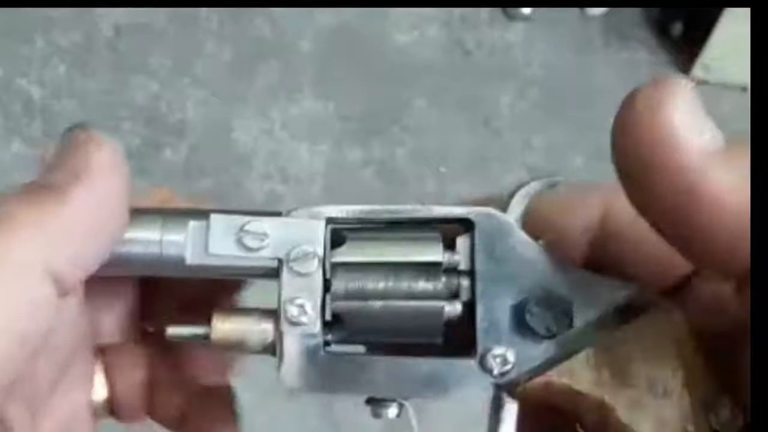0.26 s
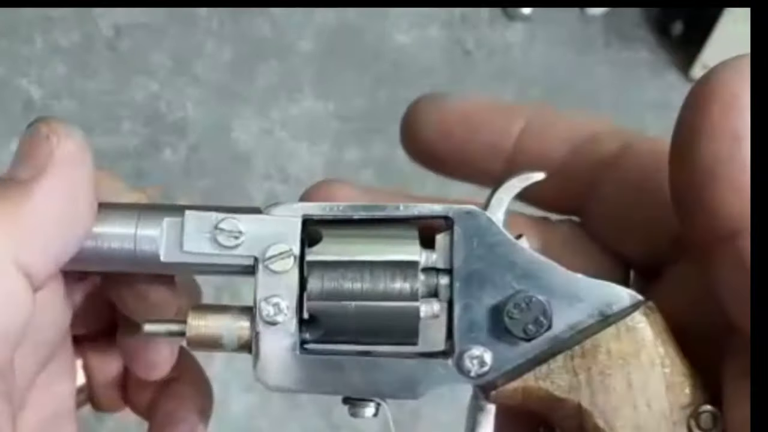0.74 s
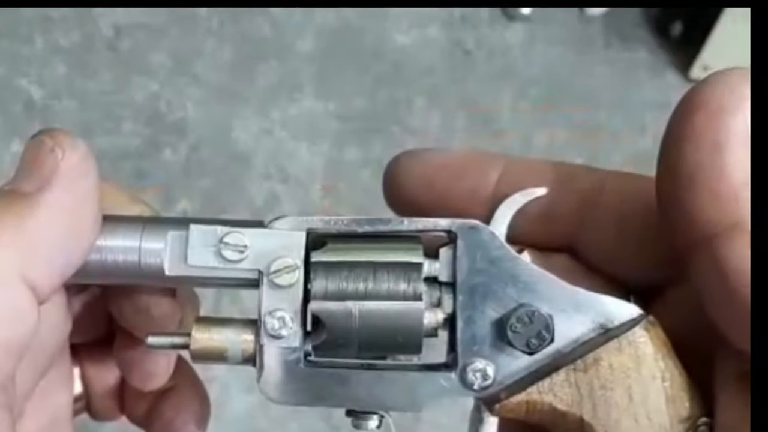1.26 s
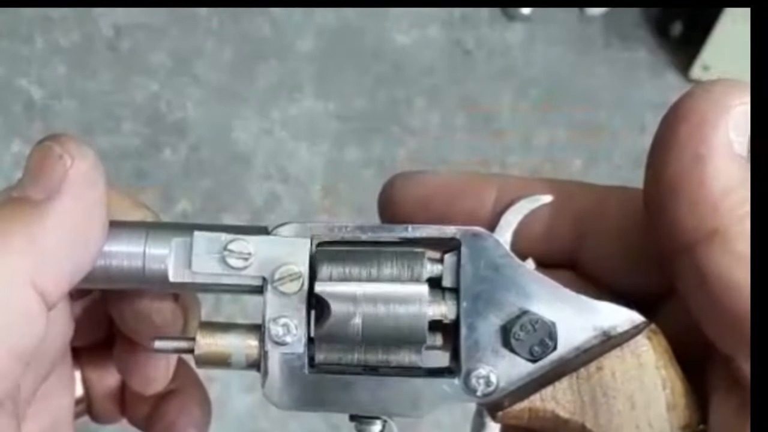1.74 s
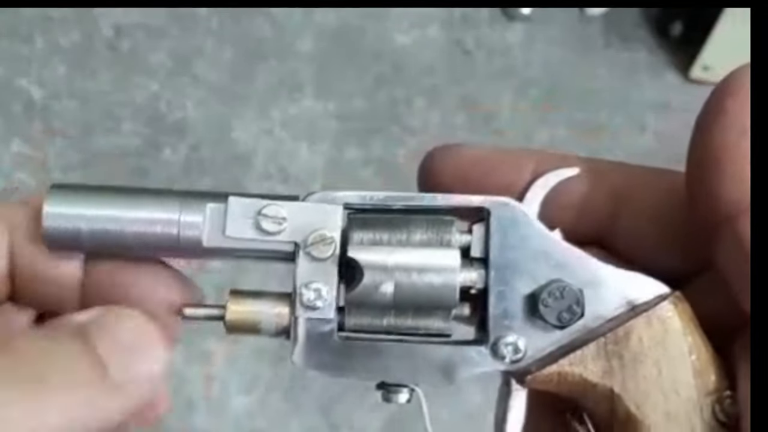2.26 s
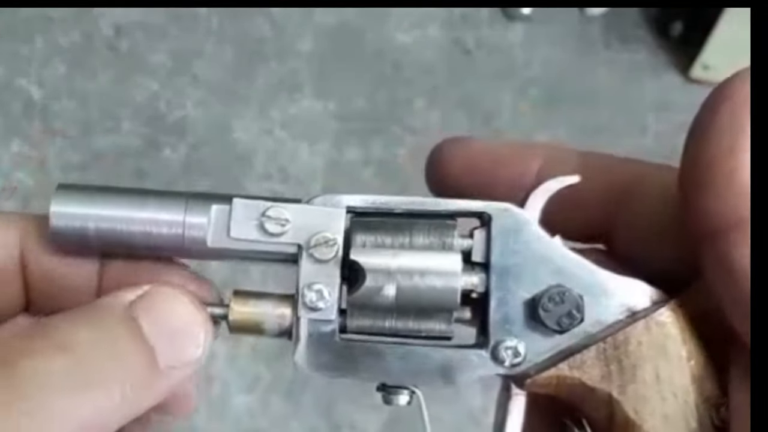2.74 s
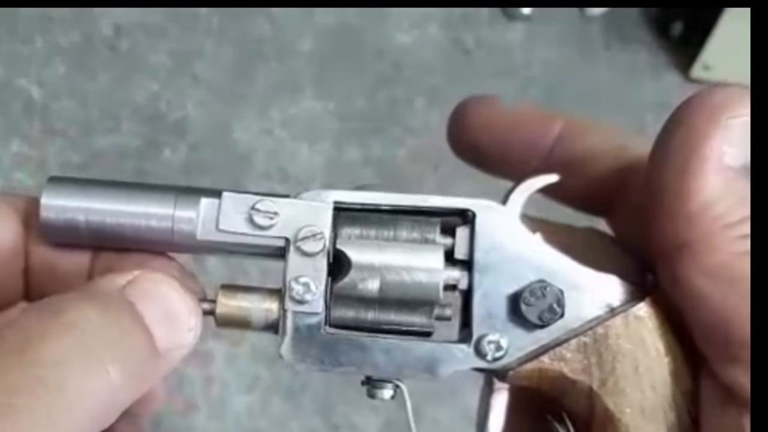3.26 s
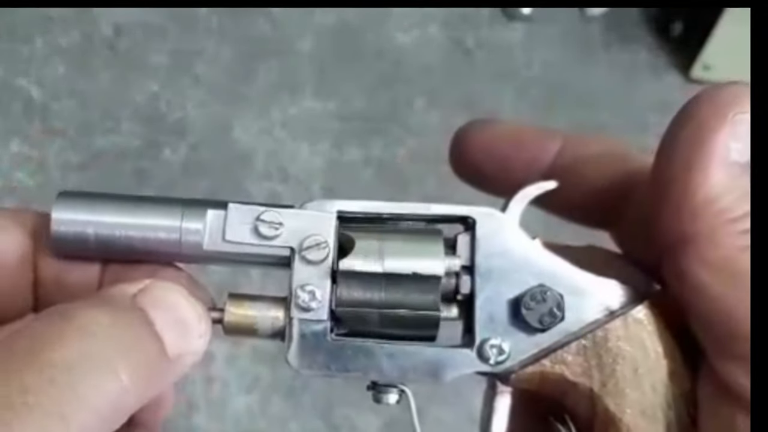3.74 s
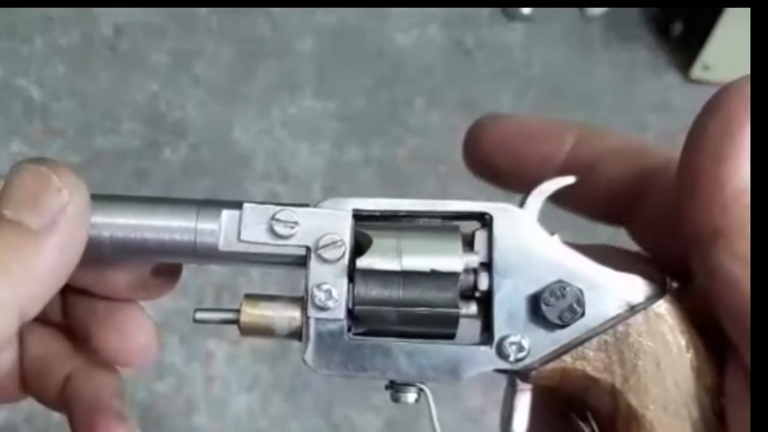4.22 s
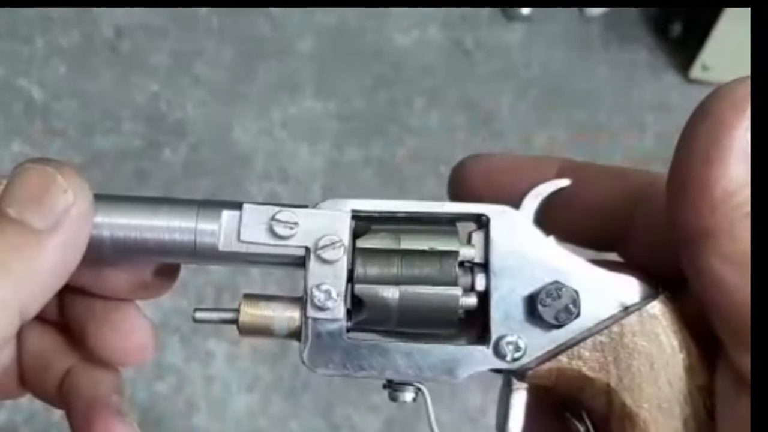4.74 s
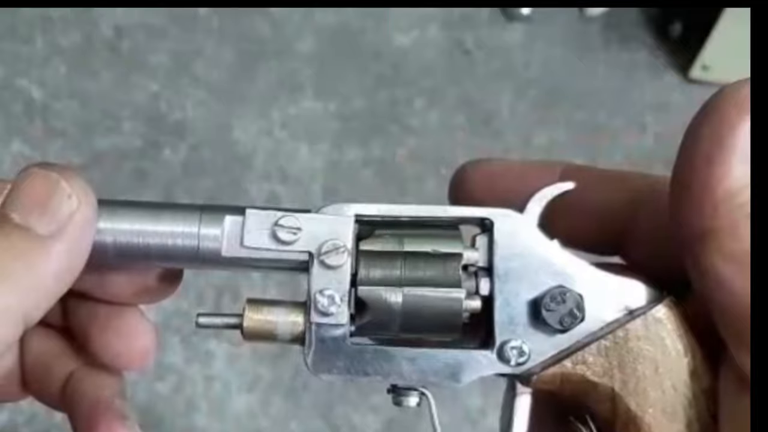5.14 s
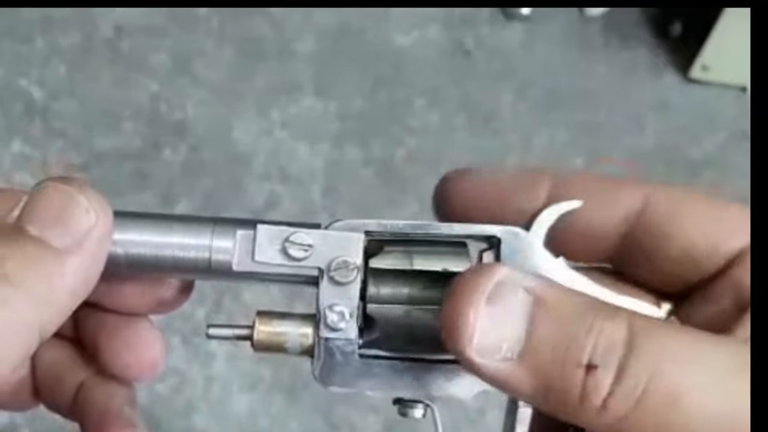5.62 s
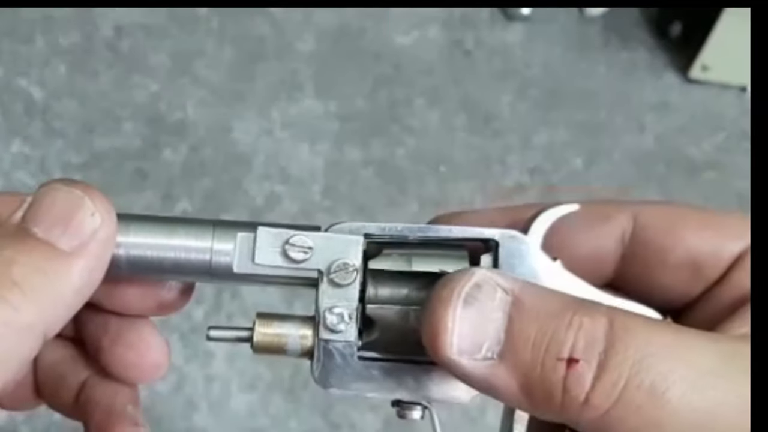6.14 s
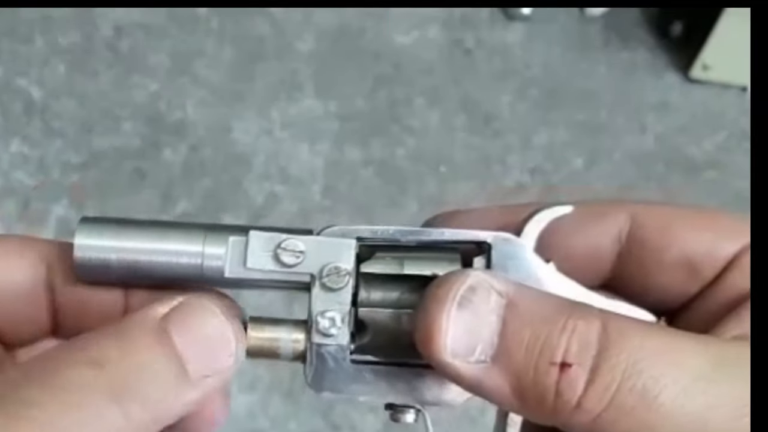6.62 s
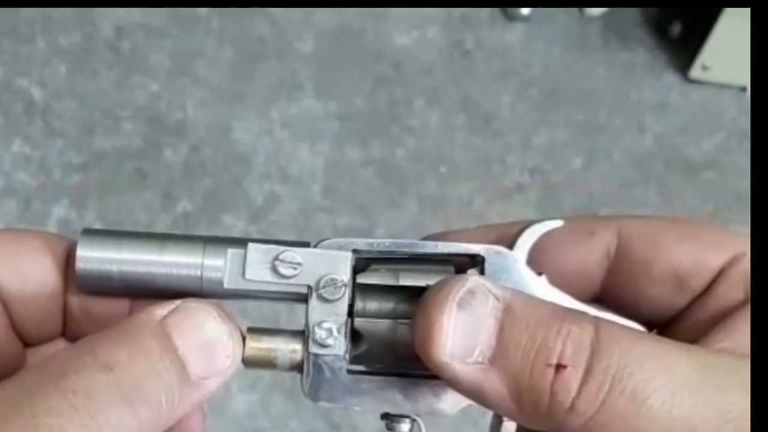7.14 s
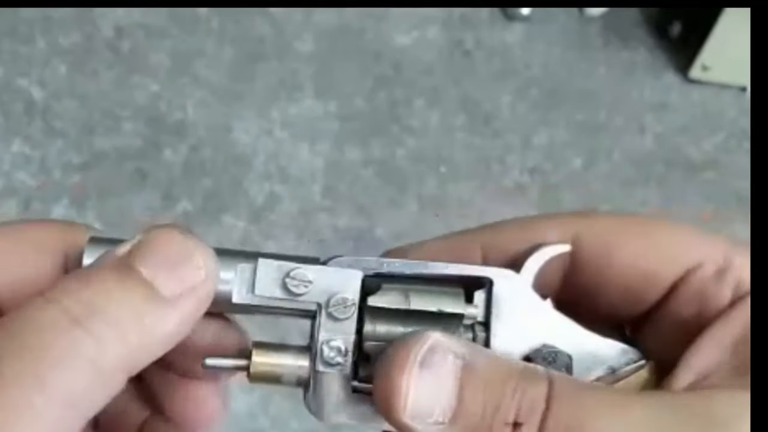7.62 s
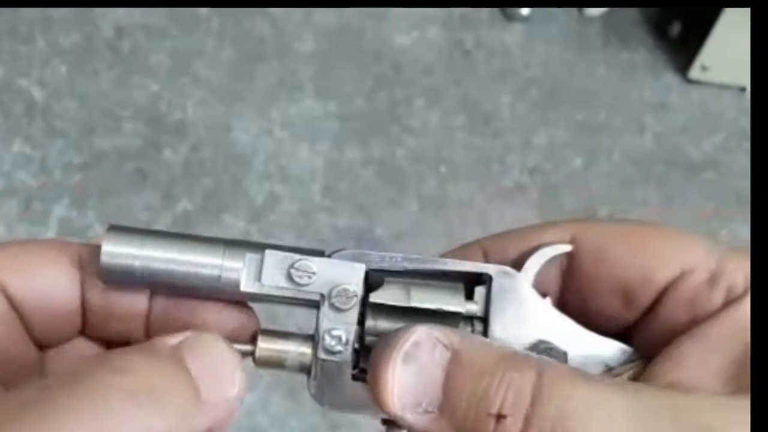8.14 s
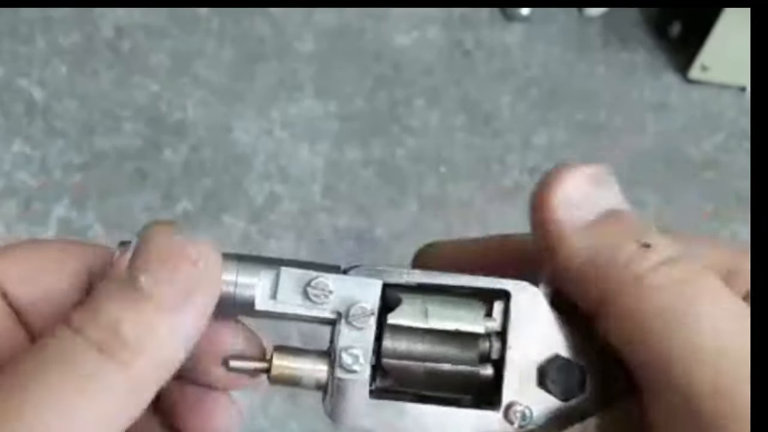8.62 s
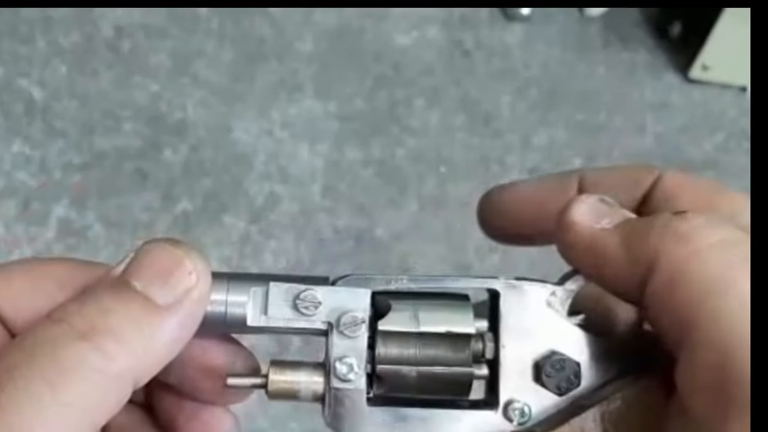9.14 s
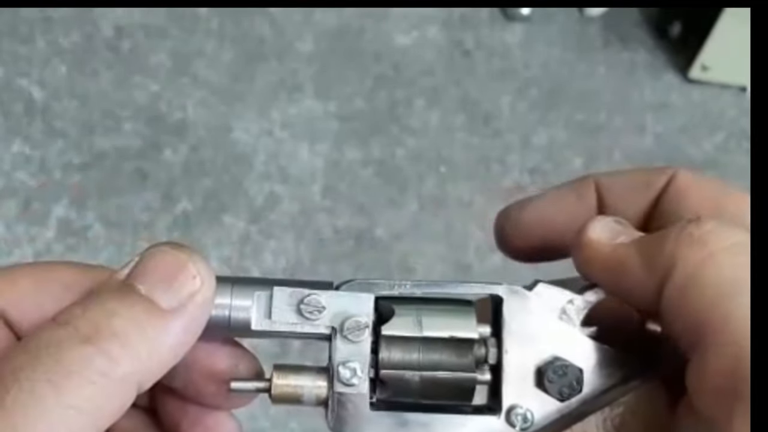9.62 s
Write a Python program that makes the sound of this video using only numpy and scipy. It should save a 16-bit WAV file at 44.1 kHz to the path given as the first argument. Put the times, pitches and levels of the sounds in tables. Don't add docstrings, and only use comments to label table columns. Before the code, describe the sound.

Small steel revolver handled in a hard-walled workshop: two sharp close metallic snaps, brief cylinder rub, scattered ticks and clanks over low hum.

```python
import sys
import numpy as np
from scipy import signal
from scipy.fft import rfft, irfft, next_fast_len
from scipy.io import wavfile

SR = 44100
rng = np.random.default_rng(int(sys.argv[2]) if len(sys.argv) > 2 else 0)


def makeup_ratio(level_db):
    decades = np.asarray(level_db, float) / 20
    return 10 ** decades


def master(y):
    cut = np.clip(np.atleast_2d(y).T, -1, 1)
    pcm = np.round(cut * 32767)
    wavfile.write(sys.argv[1], SR, pcm.astype(np.int16))


N = 435708
RIGHT_LAG = 10


def rms_one(x):
    return x / np.sqrt(np.mean(x ** 2) + 1e-20)


def in_time(rows):
    s, *columns = np.transpose(rows)
    return [np.interp(np.arange(N) / SR, s, c) for c in columns]


def at_hz(points, hz):
    points_hz, values = np.transpose(points)
    return np.interp(np.log(hz), np.log(points_hz), values)


def drift(rate_hz, at=np.arange(N)):
    step = 40
    r = np.exp(-2 * step * np.pi * rate_hz / SR)
    noise = rng.standard_normal(N // step + 2002)
    slow = signal.lfilter([1], [1, -2 * r, r * r], noise)[2000:]
    return np.interp(at / step, np.arange(len(slow)), rms_one(slow))


def swell_db(t, start_s, end_s, rise_s, fall_s):
    before = np.maximum(start_s - t, 0)
    after = np.maximum(t - end_s, 0)
    return -20 * (before / rise_s + after / fall_s)


def resonance(x, hz, width_hz):
    r = np.exp(-np.pi * width_hz / SR)
    poles = [1, -2 * r * np.cos(2 * np.pi * hz / SR), r * r]
    return signal.lfilter((1 - r * r) / 2 * np.array([1, 0, -1]), poles, x)


def modes(x, table):
    return sum(makeup_ratio(db) * resonance(x, hz, width_hz) for hz, width_hz, db in table)


def band(x, low_hz, high_hz, order=2):
    sos = signal.butter(order, [low_hz, min(high_hz, .45 * SR)], "band", fs=SR, output="sos")
    return signal.sosfilt(sos, x) * np.sqrt(SR / 2 / (high_hz - low_hz))


def add(out, start_s, sound):
    i = round(start_s * SR)
    out[:, i:i + sound.shape[1]] += sound[:, :N - i]


def contact_and_echoes(direct_db, room_db, contact_s, first_echo_s, build_s, alike=0, chatter=0.39):
    room_t60_s = 0.21
    t = np.arange(round(.3 * SR)) / SR
    burst = chatter * rng.standard_normal(len(t)) * makeup_ratio(-60 * t / contact_s)
    burst[0] = 2
    lumps = np.repeat(rng.standard_normal((2, len(t) // 60 + 1)), 60, axis=1)[:, :len(t)]
    shared = rng.standard_normal(len(t))
    own = rng.standard_normal((2, len(t)))
    alike = np.clip(alike, 0, 1)
    echoes = (np.sqrt(alike) * shared + np.sqrt(1 - alike) * own) * makeup_ratio(1.5 * lumps)
    late = np.maximum(t - first_echo_s, 0)
    echoes = echoes * (1 - np.exp(-late / build_s)) * makeup_ratio(-60 * late / room_t60_s)
    return makeup_ratio(direct_db) * np.stack([burst, burst]), makeup_ratio(room_db) * echoes


def strike(*args, **options):
    return sum(contact_and_echoes(*args, **options))


def banded_noise(spectrum, edges, patchy_db):
    # pitch_hz, likeness (0 to 1)
    likeness = [(60, 0.34), (200, 0.56), (400, 0.56), (700, 0.79), (1300, 0.34), (3000, 0.075)]
    out, white = 0, rng.standard_normal((2, 2, N))
    for k, (low_hz, high_hz) in enumerate(zip(edges, edges[1:])):
        sos = signal.butter(2, [low_hz, high_hz], "band", fs=SR, output="sos")
        mid, side = signal.sosfilt(sos, white[k % 2])
        centre_hz = np.sqrt(low_hz * high_hz)
        alike = np.clip(at_hz(likeness, centre_hz), -1, 1)
        gain = makeup_ratio(at_hz(spectrum, centre_hz) + patchy_db * drift(5.7))
        out = out + gain * (np.sqrt(1 + alike) * mid + np.sqrt(1 - alike) * side * [[1], [-1]])
    return rms_one(out)


def background():
    # time_s, level_db
    activity = [(0.0, -61), (1.13, -61), (1.7, -55.5), (2.72, -61), (3.16, -57), (3.44, -59), (6.55, -62),
                (7.6, -58.5), (8.03, -60.5), (9.74, -61), (9.88, -58.5)]
    # pitch_hz, density_db (per Hz)
    low_air = [(20, -27.5), (48, -6.5), (75, -7.5), (143, 0), (188, -1.5), (226, -4), (292, -32),
               (385, -22)]
    # pitch_hz, density_db (per Hz)
    bustle_air = [(292, -29), (385, -22.5), (452, -29), (597, -29), (926, -26), (1340, -29), (5000, -39.5),
                  (6500, -68)]
    bustle_db, = in_time(activity)
    mid, side = rng.standard_normal((2, N))
    air = mid + 0.2 * side * [[1], [-1]]
    rumble = makeup_ratio(-65) * rms_one(band(air, 84.0, 110.0))
    hum = makeup_ratio(-61.5) * rms_one(band(air, 182.3, 202.4) + makeup_ratio(-5.5) * band(air, 159.0, 170.2))
    overtones = makeup_ratio(-69.5) * band(air, 427.7, 471.6) + makeup_ratio(-72.0) * band(air, 241, 300)
    low = makeup_ratio(-55.5) * banded_noise(low_air, 22 * 2 ** np.arange(0, 3.9, .4), patchy_db=2.5)
    bustle = banded_noise(bustle_air, 290 * 2 ** np.arange(0, 4.1, .33), patchy_db=2.0)
    return rumble + hum + overtones + low + makeup_ratio(bustle_db + 1.5) * bustle


def drones():
    # middle_s,
    # pitch_hz, level_db, length_s
    machines = [(.1, 84, -53.5, 0.24), (0.456, 84, -59, 0.23), (1.2, 85, -47, 0.086),
                (1.598, 85, -48, 0.13), (2.054, 86, -54, 0.35), (2.85, 66, -62, 0.57),
                (4.3, 100, -61, 0.66), (4.55, 66, -67, 0.55), (7.0, 86, -60.5, 0.72), (7.924, 87, -46, .04),
                (8.35, 86, -46, 0.05), (9.0, 104, -64.5, 0.66), (.6, 192, -57.5, 1.0),
                (1.203, 197, -48.5, 0.065), (1.8, 168, -58, 0.67), (2.56, 195, -53.5, 0.14),
                (3.19, 182, -40, 0.03), (4.21, 197, -56, 0.82), (5.29, 198, -50.5, 0.47),
                (6.146, 190, -57, .6), (7.0, 196, -56.5, 0.052), (7.646, 198, -57.5, .1),
                (7.92, 172, -53.5, .06), (8.34, 178, -52, 0.047), (9.85, 193, -55, 0.055)]
    wobble_hz, steady = 6.8, 1.15
    out = np.zeros(N)
    for middle_s, hz, db, length_s in machines:
        start_s, end_s = middle_s - length_s / 2, middle_s + length_s / 2
        edge_s = 0.095 + 0.44 * length_s
        first = max(0, round((start_s - 2 * edge_s) * SR))
        last = min(N, round((end_s + 2 * edge_s) * SR))
        i = np.arange(first, last)
        waver = min(1, length_s / 0.25)
        a, b = waver * drift(wobble_hz, i), waver * drift(wobble_hz, i)
        phase = 2 * np.pi * hz * i / SR
        tone = (steady + a) * np.cos(phase) + b * np.sin(phase)
        out[i] += makeup_ratio(db - 3.0 + swell_db(i / SR, start_s, end_s, edge_s, edge_s)) * tone
    return out


def knocks():
    # start_s, peak_db, ring_hz, body_db, hardness_db
    dull_knocks = [(0.813, -48.5, 1130, -7, 5.5), (1.443, -42, 1100, -3, 3), (2.513, -48, 1040, 0, -2),
                   (2.578, -45.5, 795, -14, -14), (2.94, -44.5, 1130, -0.5, 0),
                   (3.07, -44.5, 466, -15, -2.5), (3.152, -26.5, 1300, 1.0, 3),
                   (3.655, -53, 635, 0.5, -15.5), (3.723, -36.5, 1640, -15, 5), (3.809, -50.5, 1420, -1, 4),
                   (4.249, -50.5, 465, 0.5, 4.5), (4.742, -39, 721, -11.5, 11.5),
                   (5.152, -32, 500, -17.5, -3), (5.171, -38, 550, -16, -6), (5.182, -49, 675, -16, -6),
                   (5.196, -43, 490, -10, -6), (5.759, -52, 2330, -5, 10), (6.894, -52, 1060, -3, 7),
                   (6.946, -40.5, 1340, -2.5, 19), (7.49, -42.5, 716, -11, -7), (7.591, -44, 960, -8.5, 12),
                   (7.724, -37, 1120, -13, 2.5), (7.864, -36, 1070, 0.2, -3.5), (8.029, -43, 774, -12, -2),
                   (8.316, -42, 1130, -6, 11), (8.56, -61, 480, 9, 9.5)]
    # start_s, peak_db, ring_hz
    hollow_thuds = [(2.599, -42, 269), (2.945, -41, 2100), (3.055, -44, 1240), (3.153, -21, 860),
                    (3.154, -34, 286), (3.726, -39.5, 2280), (8.32, -40.5, 1900), (8.322, -48, 604),
                    (9.771, -47, 1010), (5.197, -39, 2430), (7.864, -35, 730), (3.1, -43, 1300)]
    out = np.zeros((2, N))
    for start_s, db, hz, body_db, hard_db in list(dull_knocks) + [(*row, -24, 0) for row in hollow_thuds]:
        blow = strike(11.4, 0.0, contact_s=0.0062, first_echo_s=0.0018, build_s=0.005, alike=0.27)
        thud = makeup_ratio(-hard_db) * band(blow, 374, 840, order=3)
        rap = makeup_ratio(hard_db) * band(blow, 2020, 3360, order=3)
        broad = makeup_ratio(body_db) * (band(blow, 836, 1800, order=3) + makeup_ratio(-6.5) * (thud + rap))
        ring = makeup_ratio(-4.5) * band(blow, hz * 0.878, hz * 1.128)
        add(out, start_s, makeup_ratio(db - 2.5) * (broad + ring))
    return out


def ticks(table, sharpness, gain_db):
    out = np.zeros((2, N))
    for start_s, db, hz, room_db in table:
        blow = strike(0.0, room_db - 5.0, contact_s=0.011, first_echo_s=0.0076, build_s=0.0045)
        ring = resonance(resonance(blow, hz, hz / sharpness), hz, hz / sharpness)
        add(out, start_s, makeup_ratio(db + gain_db) * ring)
    return out


def small_parts():
    # start_s, peak_db, ring_hz, room_db
    contacts = [(0.8586, -39, 6100, -22), (2.596, -41, 4700, -25), (3.5947, -42.5, 5200, -18),
                (4.2453, -47.5, 7300, -4.5), (5.9388, -34, 9100, -18), (6.6363, -40, 4900, -18),
                (6.806, -44.5, 5000, -18), (7.2449, -40.5, 5800, 2), (7.3577, -40.5, 5500, -4.5),
                (8.7228, -40, 7300, -8), (8.8105, -47, 7500, -15), (8.762, -43, 7700, -12),
                (8.682, -46, 5000, -16), (7.678, -48, 6400, -12), (7.6098, -40, 5200, -14),
                (6.9643, -25, 5000, -22), (6.948, -29, 8000, -22), (9.5876, -48, 4500, -18)]
    # start_s, peak_db, ring_hz, room_db
    pings = [(2.597, -53, 3950, -20), (2.779, -42, 4000, -14), (4.417, -53, 3970, -5),
             (7.678, -43, 4300, -19), (9.475, -51, 6600, -21), (6.8678, -42, 6500, -18),
             (1.4405, -42, 5400, -16), (8.754, -43, 4500, -8), (8.69, -52, 4440, -13)]
    # start_s, peak_db, ring_hz, room_db
    more_pings = [(3.128, -56, 4200, -14), (4.268, -50, 3900, -10), (4.268, -52, 6900, -12),
                  (4.42, -54, 7400, -10), (4.355, -56, 6500, -10), (7.678, -50, 7400, -18),
                  (8.347, -46, 4200, -16), (8.317, -46, 4900, -12), (8.562, -48, 8300, -10),
                  (9.588, -53, 6900, -18), (8.81, -52, 4400, -14), (3.162, -43, 2600, -2),
                  (5.2, -50, 7000, 0), (3.153, -33, 4500, -12), (6.946, -40, 3600, -4),
                  (4.9, -50, 6000, -12), (2.597, -50, 6300, -16)]
    return ticks(contacts, 1.3, gain_db=14) + ticks(pings, 5.0, gain_db=24) + ticks(more_pings, 5.5, gain_db=24)


def squeaks():
    # peak_s, pitch_hz, peak_db, rise_s, fall_s (per 20 dB)
    events = [
        (8.197, 5800, -51.5, .012, .075),
        (1.152, 1010, -63, .05, .055),
        (9.32, 2178, -77, .1, .33),
        (9.15, 2150, -89, .45, .5),
        (9.7, 2180, -86, .3, .4),
        (9.48, 2520, -89, .4, .6),
    ]
    widths = [600, 60, 16, 30, 30, 24]
    steadiness = [0, 0, 5.0, 2.0, 2.0, 1.5]
    out, t = np.zeros((2, N)), np.arange(N) / SR
    for (peak_s, hz, db, rise_s, fall_s), width_hz, steady in zip(events, widths, steadiness):
        smooth = signal.butter(4, width_hz / 2, fs=SR, output="sos")
        wobble = rms_one(signal.sosfilt(smooth, rng.standard_normal((2, 2, N))))
        phase = 2 * np.pi * hz * (t + np.array([[0], [RIGHT_LAG / SR]]))
        tone = (steady + wobble[0]) * np.cos(phase) + wobble[1] * np.sin(phase)
        out += makeup_ratio(db + 16.0 + swell_db(t, peak_s, peak_s, rise_s, fall_s)) * rms_one(tone)
    return out


def steel(blow, hz, crack_db, bright_db, air_db):
    low = makeup_ratio(-bright_db) * band(blow, 3450, 5150, order=3)
    high = makeup_ratio(4.5) * band(blow, 5470, 9160, order=3)
    air = makeup_ratio(air_db + 11.5) * band(blow, 9600, 18500)
    ring = makeup_ratio(-5.0) * band(blow, hz * 0.866, hz * 1.096, order=3)
    return makeup_ratio(crack_db) * (low + high + air) + ring


def clanks():
    # start_s, peak_db, ring_hz, crack_db, brightness_db
    tool_clanks = [(1.3379, -23, 4370, -4, 10), (1.4394, -41, 3800, -5, 1), (2.15, -46, 6940, -4, -3),
                   (2.1834, -33, 3140, -13, 6), (2.257, -34.5, 3260, -8, 1), (2.937, -40, 2650, -13.5, -7),
                   (3.153, -19, 4100, -5.5, -1), (3.454, -39.5, 8750, -10, -1),
                   (3.7163, -39.5, 6000, 3.5, 2), (3.8036, -36, 8900, -9, 0), (4.2448, -42.5, 6940, -6, -8),
                   (4.7436, -35, 6900, -3, 11.5), (5.1915, -29.5, 7040, -7, -6), (6.86, -40, 6200, -10, 3),
                   (6.896, -41, 7700, -11, -14), (6.9468, -19.5, 4730, -3.5, -8),
                   (7.243, -30, 6300, -25, -14), (7.3596, -37, 5730, -1, 20.5), (7.592, -23, 5000, -14, -2),
                   (7.856, -27, 5470, -13, -2.5), (8.31, -30.5, 4680, -5, 7), (8.682, -44.5, 8600, 0.1, 3)]
    # start_s, peak_db, ring_hz, crack_db
    second_rings = [(2.155, -38, 9000, -30), (2.191, -36, 4300, -30), (3.151, -20, 8900, -30),
                    (4.268, -48, 8850, -27), (6.945, -17.5, 7900, -8.5), (7.593, -24.5, 4300, -30),
                    (8.2, -40, 6900, -4), (3.283, -44, 4100, -30), (4.746, -34, 5000, -30),
                    (9.415, -45, 4020, -20), (5.904, -36, 14000, -30), (8.882, -43, 4400, -20),
                    (1.338, -24.5, 12500, -30), (6.52, -36, 13000, -30)]
    out = np.zeros((2, N))
    for start_s, db, *colour in list(tool_clanks) + [(*row, 6) for row in second_rings]:
        blow = strike(5.4, 0.0, contact_s=0.017, first_echo_s=0.00087, build_s=0.0076, alike=0.1)
        add(out, start_s, makeup_ratio(db - 8.5) * steel(blow, *colour, air_db=-16))
    return out


def cylinder_rub():
    # time_s, level_db
    rub_level = [(1.36, -54), (1.4, -61), (1.51, -60), (1.6, -57.5), (1.67, -55), (1.72, -53), (1.8, -54),
                 (1.9, -55.5), (1.95, -65), (2.02, -73)]
    # pitch_hz, width_hz, level_db
    rub_modes = [(930, 150, 12), (1400, 314, 6), (2960, 900, 8), (3600, 400, 7), (5400, 2000, 6.5),
                 (7800, 380, 11.5), (8400, 2200, -1)]
    before, after = (rub_level[0][0] - .02, -90), (rub_level[-1][0] + .05, -90)
    db, = in_time([before] + list(rub_level) + [after])
    rub = rms_one(modes(rng.standard_normal((2, N)), rub_modes))
    return makeup_ratio(db + 5.5 + 1.5 * drift(4.1)) * rub


def snap_blow(touches, room_db, chatter):
    blow, echoes = contact_and_echoes(0.0, room_db, contact_s=0.016, first_echo_s=.003, build_s=.004,
                                      chatter=chatter)
    blow[:, 0] = 0
    for k, (ms, touch_db) in enumerate(touches):
        blow[:, round((ms + .35) * SR / 1000)] += 2 * makeup_ratio(touch_db) * (-1) ** k
    wall = round(0.0098 * SR)
    blow[:, wall:] += makeup_ratio(-22) * blow[:, :-wall]
    return blow, echoes


def radiate(blow, ringing, low_hz, push_db):
    small = band(ringing, low_hz, 19000, order=4)
    jolt = np.abs(blow) * (np.arange(blow.shape[1]) < 50)
    return small + makeup_ratio(push_db) * band(jolt, 40, 1240, order=1)


def latch_snap(room_db):
    # after_ms, level_db
    touches = [(-0.29, -15), (0.0, -1.5), (0.32, -6), (0.85, -3.5), (1.48, -5), (2.82, -14), (4.76, -13)]
    # pitch_hz, width_hz, level_db
    body = [(2440, 590, -7), (3540, 220, -9), (3850, 280, 0.5), (4700, 400, -3), (5250, 500, -1),
            (6150, 280, 2), (6740, 240, -4), (7420, 330, -3), (8750, 420, 7), (10790, 260, 1.5),
            (11760, 260, 1)]
    # pitch_hz, width_hz, level_db
    top = [(13000, 510, -8), (15550, 300, 1)]
    # pitch_hz, width_hz, level_db
    wall_ranges = [(3600, 1100, -2.5), (4700, 900, -3), (5700, 1200, -1), (7100, 1200, -4), (8800, 900, -3),
                   (11300, 1000, -1), (13500, 2500, -11), (15500, 1000, -12)]
    blow, echoes = snap_blow(touches, room_db, chatter=0.1)
    ringing = modes(blow, list(body) + list(top)) + makeup_ratio(-17) * blow + modes(echoes, wall_ranges)
    return radiate(blow, ringing, low_hz=3100, push_db=-32.0)


def hammer_snap(room_db):
    # after_ms, level_db
    touches = [(-0.14, -12), (0.0, 0.5), (0.48, -3.5), (1.7, -13.5), (2.52, -15)]
    # pitch_hz, width_hz, level_db
    body = [(4400, 260, -7), (5300, 600, -17), (6010, 240, -5), (6550, 260, 7.5), (7500, 650, 9.5),
            (9060, 320, 2.5), (9480, 300, 5), (13370, 500, -16), (15800, 1800, -7)]
    # pitch_hz, width_hz, level_db
    wall_ranges = [(4300, 1000, -11), (5500, 1200, -5), (6600, 450, 6), (7500, 900, 1), (9250, 600, 3),
                   (13000, 1200, -3), (15000, 1500, -8)]
    # pitch_hz, width_hz, level_db
    quiet_range = (11000, 1900, -18)
    blow, echoes = snap_blow(touches, room_db, chatter=0.07)
    ringing = modes(blow, body) + makeup_ratio(-28) * blow + modes(echoes, wall_ranges)
    gap_hz, gap_width_hz, gap_db = quiet_range
    ringing = ringing + (makeup_ratio(gap_db) - 1) * resonance(ringing, gap_hz, gap_width_hz)
    return radiate(blow, ringing, low_hz=3900, push_db=-45)


def snaps():
    # start_s, peak_db, room_db
    events = [
        (1.7257, -2.5, -26.5),
        (9.8127, -3.3, -32),
    ]
    right_leads = [-1, 3]
    out = np.zeros((2, N))
    for (start_s, db, room_db), part, lead in zip(events, [latch_snap, hammer_snap], right_leads):
        left, right = makeup_ratio(db + 8.5) * part(room_db)
        add(out, start_s, np.stack([left, np.roll(right, -lead)]))
    return out


def slides():
    # start_s, peak_db, ring_hz, rustle_db, brightness_db
    events = [(3.0796, -43, 8660, -8, 1), (4.8987, -37.5, 6100, -7.5, 10.5), (5.761, -45, 3430, -8, -4),
              (5.909, -27, 9260, -10, 6.5), (6.509, -35, 8500, -8.5, 4), (7.4876, -47.5, 6660, 2.5, 1),
              (8.488, -41, 7900, -8, -4), (8.539, -40, 8000, 0, 23), (8.728, -35, 8700, -12, 8),
              (8.735, -39, 4660, -20, 10.5), (8.9, -37.5, 8000, -4, 0.5), (9.1697, -38.5, 9200, -16, 6)]
    out = np.zeros((2, N))
    for start_s, db, *colour in events:
        blow = strike(-1.8, 0.0, contact_s=0.016, first_echo_s=0.00065, build_s=0.021, alike=0.33)
        add(out, start_s, makeup_ratio(db - 3.5) * steel(blow, *colour, air_db=-11))
    return out


def scene():
    revolver = small_parts() + cylinder_rub() + snaps()
    workshop = background() + drones() + knocks() + squeaks() + clanks() + slides()
    left, right = revolver + workshop
    return np.stack([left, np.roll(right, RIGHT_LAG)])


def band_limit(x):
    return signal.sosfilt(signal.butter(12, 15920, fs=SR, output="sos"), x)


def record(dry):
    # pitch_hz, width_hz, boost_db
    left_port = [(9050, 3400, 5.5), (10440, 1750, -7), (13900, 1500, -3)]
    # pitch_hz, width_hz, boost_db
    right_port = [(8000, 1600, -29), (10100, 5700, -51), (14300, 2000, -17)]
    # pitch_hz, density_db (per Hz)
    hiss_colour = [(1000, 4), (3000, 1.5), (6000, 3), (10500, -0.5), (14000, 2), (15500, 2.5), (16500, -5)]
    ports = []
    for x, colour in zip(dry, [left_port, right_port]):
        for hz, width_hz, db in colour:
            x = x + (makeup_ratio(db) - 1) * resonance(x, hz, width_hz)
        ports.append(x)
    size = next_fast_len(N)
    shape = makeup_ratio(at_hz(hiss_colour, np.arange(size // 2 + 1) * SR / size + 1))
    hiss = rms_one(irfft(rfft(rng.standard_normal((2, size))) * shape, size)[:, :N])
    mix = np.clip(ports, -.9, .9) + makeup_ratio(-59) * hiss
    top_cut = signal.cheby2(14, 60, 16650, fs=SR, output="sos")
    return band_limit(signal.sosfilt(top_cut, mix))


dry = scene()
out = record(dry)
master(out)
```